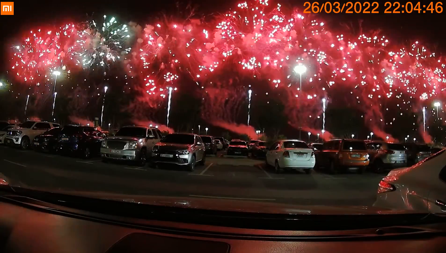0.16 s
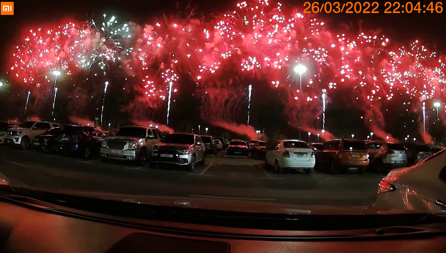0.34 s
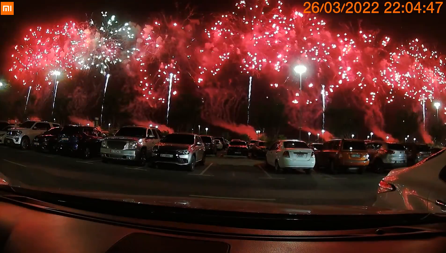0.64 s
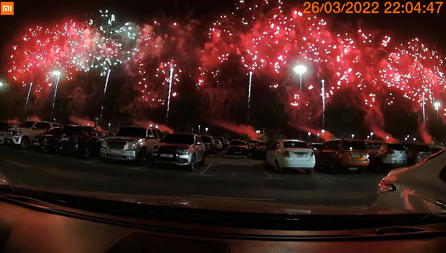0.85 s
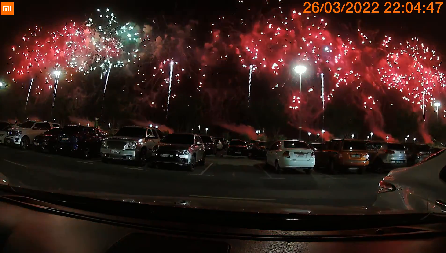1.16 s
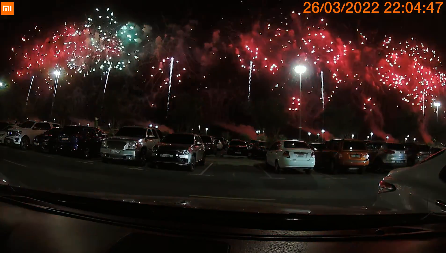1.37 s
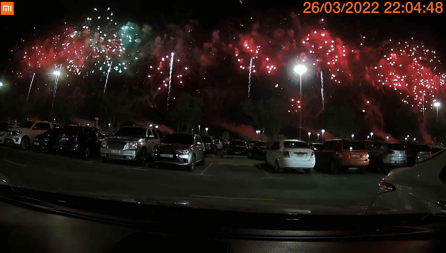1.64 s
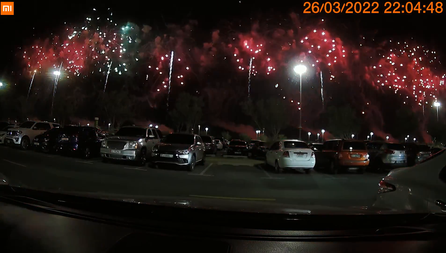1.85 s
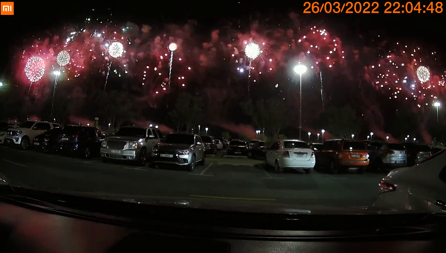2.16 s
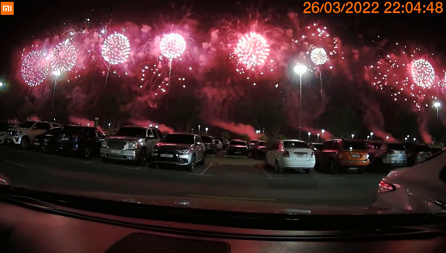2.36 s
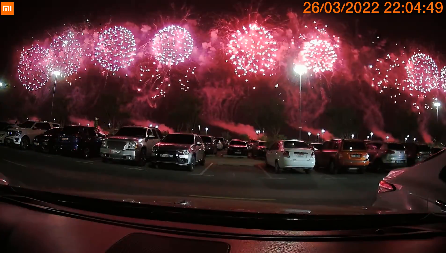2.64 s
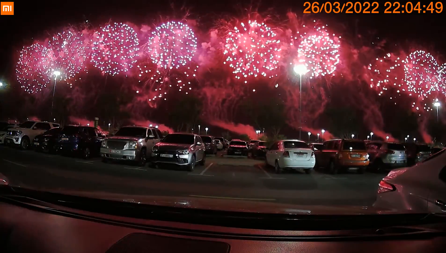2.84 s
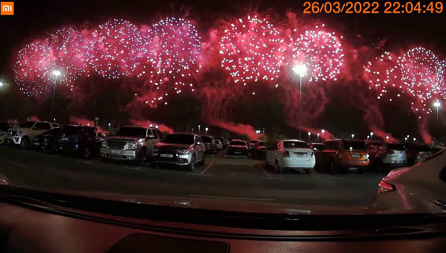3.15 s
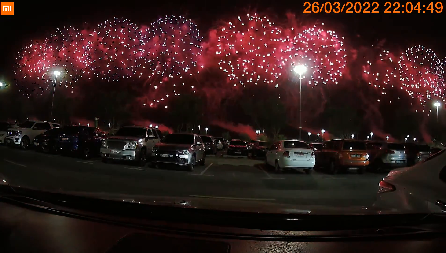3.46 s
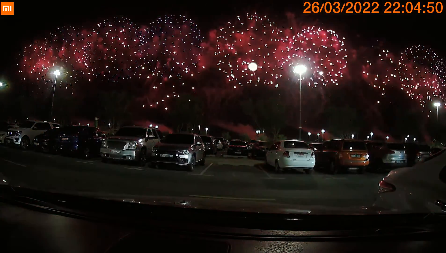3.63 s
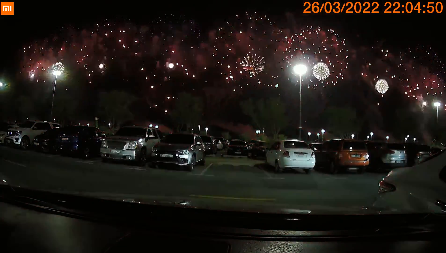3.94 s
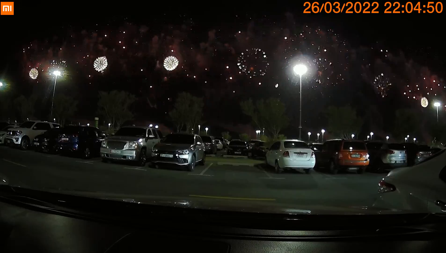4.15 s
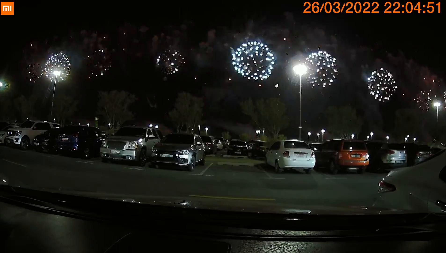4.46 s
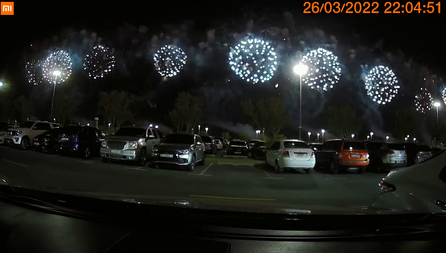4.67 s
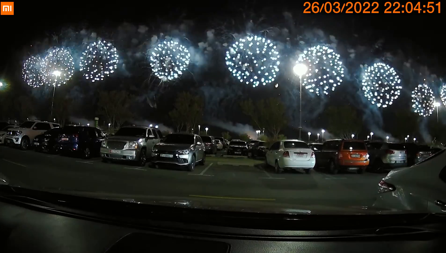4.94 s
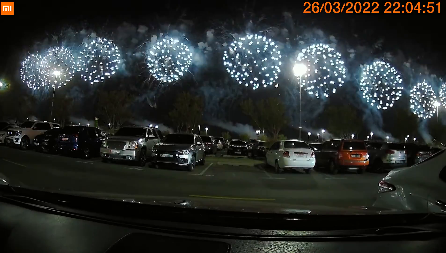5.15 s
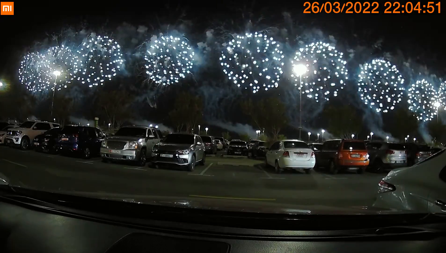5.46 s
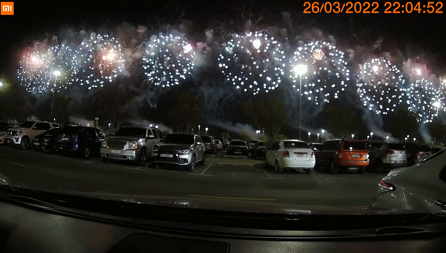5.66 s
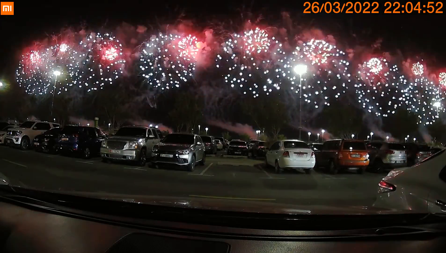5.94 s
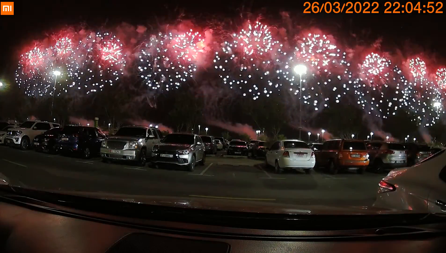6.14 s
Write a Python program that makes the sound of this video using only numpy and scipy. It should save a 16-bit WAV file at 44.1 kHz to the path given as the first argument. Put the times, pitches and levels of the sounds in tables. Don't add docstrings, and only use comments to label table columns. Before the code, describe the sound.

Muffled firework volleys thump against a closed car, ringing its glass and panels, while far shells pop and rumble rolls on underneath.

```python
import sys
import numpy as np
from scipy import signal
from scipy.fft import rfft, irfft
from scipy.io import wavfile
from scipy.ndimage import uniform_filter1d

SR = 44100
rng = np.random.default_rng(int(sys.argv[2]) if len(sys.argv) > 2 else 0)


def transcribe(u):
    v = np.clip(np.atleast_2d(u).T, -1, 1)
    q = np.round(v * 32767).astype(np.int16)
    wavfile.write(sys.argv[1], SR, q)


def decibels_to_gain(level_db):
    exponent = np.asarray(level_db, float) / 20
    return 10 ** exponent


N = 277830
ARRIVAL_S = 0.0011

# (time [s], peak level [dB], long cabin boom [dB re peak], panel boom [dB re peak],
# crack [dB re peak])
BURSTS = [(0.088, -15, -7, -2.5, -10.5), (0.43, -14, -11.5, -4, -16), (1.182, -18, -11.5, 1, -14.5),
          (1.27, -18, -13, 2, -12), (1.447, -16, -12.5, -0.5, -17.5), (1.809, -25.5, -11, 1, -14.5),
          (1.877, -15, -12.5, 1, -11.5), (1.957, -21.5, -21, 2.5, -13), (2.079, -25.5, -14, 1, -16),
          (3.411, -10, -3.5, -0.5, -14), (3.571, -10.5, -1.5, 0, -14.5), (3.667, -9, -4.5, 1, -13.5),
          (3.88, -10.5, -4, 1, -12), (3.911, -12.5, -6, -13, -13.5), (3.941, -9.5, -20, -1, -15),
          (4.349, -14, -11, -4, -14), (4.809, -16, -5, 2, -14), (5.046, -15, -10, 2.5, -16),
          (5.318, -13.5, -9, -3, -13.5), (5.416, -15, -8, 5.5, -11.5), (5.479, -16, -10.5, 2.5, -12.5),
          (5.853, -19, -14.5, -1.5, -17.5), (5.967, -15.5, -11.5, 0.5, -14)]
TWINS = [
    (0.121, -16.5, -8, -0.5, -16),
    (0.461, -33.5, 4, -15, -20),
    (1.294, -17, -7, 3.5, -15.5),
    (1.46, -21.5, -11, -16.5, -17.5),
    (3.43, -19, 1, -6, -15),
    (3.579, -9, -16.5, -3, -13),
    (4.378, -29, -3.5, 6.5, -24),
    (5.329, -17.5, -12.5, -0.5, -18),
    (5.428, -28.5, -5.5, 4, -21),
]
# (time [s], level [dB])
RUMBLE = [(0, 2), (.7, 5), (1.3, 1.5), (1.75, -6.5), (2.2, -0.5), (2.45, 4.5), (2.8, -1.5), (3.3, 2),
          (4.2, 4.5), (4.8, 2.5), (5.2, 1.5), (5.6, 2.5), (6.3, 4)]


def evened(x):
    return x / np.sqrt(np.mean(x ** 2) + 1e-20)


def coloured(points):
    hz = np.fft.rfftfreq(N, 1 / SR)
    point_hz, level_db = np.transpose(points)
    gain = decibels_to_gain(np.interp(np.log(hz + 1), np.log(point_hz), level_db))
    return evened(irfft(rfft(rng.standard_normal(N)) * gain, N))


def slow(size):
    once = uniform_filter1d(rng.standard_normal(N), size)
    return evened(uniform_filter1d(once, size))


def curve(rows):
    return np.interp(np.arange(N) / SR, *np.transpose(rows))


def train(times, db):
    clicks = np.zeros(N)
    np.add.at(clicks, np.round((np.asarray(times) + ARRIVAL_S) * SR).astype(int), decibels_to_gain(db))
    return clicks


def wake(swell_db, steady_db, under_db, build, t60):
    s, db = np.transpose(BURSTS + TWINS)[:2]
    t = np.arange(2 * SR) / SR
    tail = (1 - np.exp(-t / build)) * decibels_to_gain(under_db - 60 * t / t60) ** 2
    fed = abs(signal.oaconvolve(train(s, db) ** 2, tail)[:N])
    earlier = decibels_to_gain(-13.5 + under_db - 60 * np.arange(N) / SR / t60) ** 2
    return np.sqrt(fed + earlier + decibels_to_gain(steady_db + swell_db) ** 2)


def roll():
    # (steady level [dB], level under the shell [dB], build-up [s], t60 [s])
    deep_roll = (-52, -26, 0.8, 1.6)
    echo_roll = (-52.5, -21, -1.2, 1.0)
    crackle_roll = (-64.5, -44, 2, 2.13)
    # (frequency [Hz], level [dB per Hz])
    deep_spectrum = [(58, -32), (80, 12), (105, 9.5), (130, 15), (165, -35.5)]
    echo_spectrum = [(88, -27.5), (150, 13), (204, 12.5), (317, 3.5), (366, 2.5), (553, -1.5), (605, -2.5),
                     (697, -11), (900, -25.5), (1170, -48), (1980, -120)]
    crackle_spectrum = [(500, -12.5), (750, 6), (1500, -3), (3000, -11), (5000, -38.5)]
    hiss_spectrum = [(1180, -50.5), (2000, -6), (3020, 7), (4330, 2), (6500, 3), (7670, -21), (8670, -23),
                     (11300, -54), (19100, -120)]
    # (time [s], level [dB])
    glitter = [(0, -1.5), (1.1, 3), (2.25, 4), (2.5, -4.5), (3.3, -1.5), (4.05, 13), (4.3, 4.5), (4.75, 0),
               (5.15, -2.5), (5.7, -19), (6.3, -2)]

    rumble_db, glitter_db = curve(RUMBLE), curve(glitter)
    flicker = slow(size=400)
    deep = wake(1.42 * rumble_db, *deep_roll) * coloured(deep_spectrum)
    deep *= decibels_to_gain(-2.0 + 2.9 * slow(size=1500))
    echo = wake(0.66 * glitter_db + 0.1 * rumble_db, *echo_roll) * coloured(echo_spectrum)
    echo *= decibels_to_gain(2.5 * flicker)
    crackle = wake(glitter_db, *crackle_roll) * coloured(crackle_spectrum)
    crackle *= decibels_to_gain(0.88 * flicker)
    return deep + echo + crackle + decibels_to_gain(-72) * coloured(hiss_spectrum)


def shock(hz, fade):
    t = np.arange(600) / SR
    rounded = 1 - np.exp(-(t / 0.0004) ** 2)
    return -np.sin(2 * np.pi * hz * t) * np.exp(-t / fade) * rounded


def ring(modes, rise, lag, detune=1):
    t = np.maximum(np.arange(SR // 2) / SR - lag, 0)
    hz, db, t60 = np.transpose(modes)[..., None]
    swings = -decibels_to_gain(db - 60 * t / t60) * np.sin(2 * np.pi * hz * detune * t)
    return (1 - np.exp(-t / rise)) * swings.sum(0)


def booms(times, db, modes, rise, lag):
    shifts = rng.standard_normal((len(times), len(modes), 1))
    out = np.zeros(N + SR)
    for s, level_db, shift in zip(times, db, shifts):
        at = round((s + ARRIVAL_S) * SR)
        out[at:at + SR // 2] += decibels_to_gain(level_db) * ring(modes, rise, lag, 1 + 0.038 * shift)
    return out[:N]


def scatter(clicks, bands, snap):
    t = np.arange(SR // 2) / SR
    out = np.zeros(N)
    for lo_hz, hi_hz, db, hold, t60 in bands:
        shape = decibels_to_gain(db - 60 * np.maximum(t - hold, 0) / t60) * (1 - np.exp(-t / 0.00019))
        shape *= 1 + snap * np.exp(-t / 0.0032)
        power = signal.oaconvolve(clicks ** 2, shape ** 2)[:N]
        noise = coloured([(lo_hz * 0.55, -40), (lo_hz, 0), (hi_hz, -6), (hi_hz * 2.37, -45)])
        out += np.sqrt(np.abs(power)) * noise
    return out * decibels_to_gain(2.2 * slow(size=110))


def bursts():
    # (time [s], peak level [dB], crack [dB re peak])
    far_shells = [(0.327, -33, -11.5), (0.716, -36, -21), (0.783, -26.5, -17), (0.918, -30, -20),
                  (0.989, -35.5, -16), (1.638, -33, -23), (1.67, -26, -24), (1.732, -31, -20),
                  (2.362, -37.5, -17), (2.459, -33, -13.5), (2.565, -34, -16), (2.683, -28.5, -22),
                  (2.709, -23.5, -21), (2.884, -25.5, -22.5), (3.039, -26, -19.5), (3.11, -26.5, -20),
                  (3.129, -24.5, -26), (3.187, -24, -21.5), (3.257, -30, -20.5), (3.386, -22.5, -22),
                  (3.504, -23.5, -19), (3.544, -21, -20.5), (3.776, -22.5, -20.5), (3.811, -20.5, -19),
                  (4.145, -30, -37), (4.213, -22.5, -21), (3.856, -22, -16.5), (4.527, -27, -23),
                  (4.68, -29, -35), (4.939, -34, -30)]
    # (time [s], peak level [dB], boom [dB re peak], crack [dB re peak])
    late_echoes = [(0.171, -30, 2, -10), (0.555, -36.5, 4.5, -14), (0.868, -34, -12, -18),
                   (1.055, -40, -20, -23), (0.259, -38, 3, -27), (2.225, -34, -30, -23),
                   (6.071, -33.5, -5, -32), (1.522, -32.5, -1.5, -20), (1.58, -26.5, -17, -32),
                   (2.172, -34, -6.5, -19), (4.201, -39.5, 0, -32), (2.307, -33, -7.5, -22),
                   (2.401, -33.5, -13, -30), (2.432, -33.5, -5, -18), (2.632, -28, -14, -20),
                   (3.347, -27.5, -13.5, -21.5), (4.085, -22.5, -11, -25), (4.307, -29, -4, -25),
                   (4.45, -30.5, -1, -29), (4.49, -23.5, -16, -29), (4.617, -25.5, -15, -25),
                   (4.732, -30.5, -13.5, -26), (4.758, -36.5, -11, -15), (4.9, -30, -10, -22),
                   (5.007, -38.5, -1.5, -9.5), (5.131, -34.5, -1.5, -20), (5.235, -38.5, -4, -22),
                   (5.666, -42, 1, -22), (6.155, -32, -9, -9.5), (6.183, -34.5, -8, -26)]
    # (frequency [Hz], level [dB], t60 [s])
    long_modes = [(79.5, -13, 0.45), (101.4, -8.5, 0.34), (132.3, 3, 0.18)]
    panel_modes = [(175.1, -10.5, 0.25), (208.3, 1.5, .13), (240.1, 2, 0.082)]
    glass_modes = [(288.4, -4, 0.3), (325.5, -3.5, 0.22), (378.6, 1, 0.18), (454, -2.5, 0.2), (556, 0, .08),
                   (640, -17.5, 0.046), (806, -13.5, 0.071), (1186, -16.5, 0.064)]
    # (low edge [Hz], high edge [Hz], level [dB], hold [s], t60 [s])
    scatter_bands = [(144, 407, -22.5, 0.015, 0.52), (454, 774, -19.5, 0.0067, 0.22),
                     (935, 1480, -27, 0.0041, 0.19)]
    crack_bands = [(1770, 4230, -15, 0.0042, 0.13), (4860, 11000, -34.5, 0.0066, 0.12)]

    s, db, long_db, panel_db, crack_db = np.transpose(BURSTS + TWINS)
    top_db = -11 + 2 * (crack_db + 15)
    pops = [(at, peak_db, -22.5, pop_db) for at, peak_db, pop_db in far_shells]
    far_s, far_db, far_boom_db, far_crack_db = np.transpose(pops + late_echoes)
    near, far = train(s, db), train(far_s, far_db)
    far_boom = train(far_s, far_db + far_boom_db)
    far_cracks = train(far_s, far_db + far_crack_db)

    out = signal.oaconvolve(near, decibels_to_gain(7) * shock(345, fade=0.003))[:N]
    out += signal.oaconvolve(far, decibels_to_gain(-2.5) * shock(389, fade=0.0029))[:N]
    out += booms(s, db - 13, glass_modes, rise=0.011, lag=0.00303)
    out += booms(far_s, far_db - 18.5, glass_modes, rise=0.009, lag=0.00099)
    out += booms(s, db + long_db + 9.5, long_modes, rise=0.0087, lag=0.00053)
    out += booms(s, db + panel_db + 2, panel_modes, rise=0.0088, lag=0.0002)
    far_ring = ring(long_modes + panel_modes, rise=0.012, lag=0.00032)
    out += signal.oaconvolve(far_boom, decibels_to_gain(5.5) * far_ring)[:N]
    out += scatter(near + 2 * far_boom, scatter_bands[:1], snap=0)
    out += scatter(near + 0.76 * far, scatter_bands[1:], snap=1.0)
    out += scatter(train(s, db + crack_db) + far_cracks, crack_bands[:1], snap=0.3)
    out += scatter(train(s, db + top_db) + 0.37 * far_cracks, crack_bands[1:], snap=2.2)
    return out


def thuds():
    # (time at the top of the swing [s], level [dB], width
    # [s])
    low_thuds = [(0.19, -26, 0.13), (0.37, -26, 0.11), (0.47, -23.5, 0.089), (0.59, -27.5, .05),
                 (0.835, -25, 0.051), (1.0, -31, 0.04), (1.1, -36.5, 0.056), (1.27, -29, 0.081),
                 (1.487, -43, 0.071), (2.04, -39, 0.094), (2.345, -30, .07), (2.5, -31, 0.092),
                 (2.589, -32, 0.023), (2.669, -30.5, 0.053), (2.883, -34, 0.028), (3.143, -42, 0.081),
                 (3.53, -28, .05), (3.78, -25, .06), (3.916, -17.5, 0.075), (4.03, -24, .08),
                 (4.111, -29.5, 0.059), (4.26, -24.5, 0.083), (4.39, -21.5, 0.058), (4.575, -33, 0.031),
                 (4.674, -34.5, .05), (4.879, -35, .09), (4.49, -30, .06), (5.63, -39.5, 0.14),
                 (5.792, -36.5, .05), (6.196, -29.5, 0.065)]
    # (frequency [Hz], level [dB])
    deep_modes = [(50, 0), (36, -7)]

    shoves = [(s + 0.03, db + long_db - 8, 0.055) for s, db, long_db, *_ in BURSTS]
    t = np.arange(0, N, 64) / SR
    power = decibels_to_gain(-44.5 + curve(RUMBLE)[::64]) ** 2
    for s, db, width in low_thuds + shoves:
        power += decibels_to_gain(db - 6 * (2 * (t - s) / width) ** 2) ** 2
    height = np.interp(np.arange(N) / SR, t, np.sqrt(power)) * decibels_to_gain(1.5 + 1.5 * slow(size=500))
    swing = np.zeros(N)
    for hz, db in deep_modes:
        turns = np.cumsum(hz * (1 + 0.1293 * slow(size=700))) / SR
        swing += decibels_to_gain(db) * np.sin(2 * np.pi * turns)
    return height * swing


def scene():
    return (roll() + bursts() + thuds())[None]


def low_pass(x):
    return signal.sosfilt(signal.butter(12, 8820, fs=SR, output="sos"), x)


def record(dry):
    x = signal.sosfilt(signal.butter(1, 14, "high", fs=SR, output="sos"), dry)
    x = 0.85 * np.tanh(x) + 0.2 * x
    band_limit = signal.firwin(81, 7880, window=("kaiser", 7), fs=SR)
    x = signal.oaconvolve(x, band_limit[None], "same")
    return low_pass(x)


dry = scene()
out = record(dry)
transcribe(out)
```